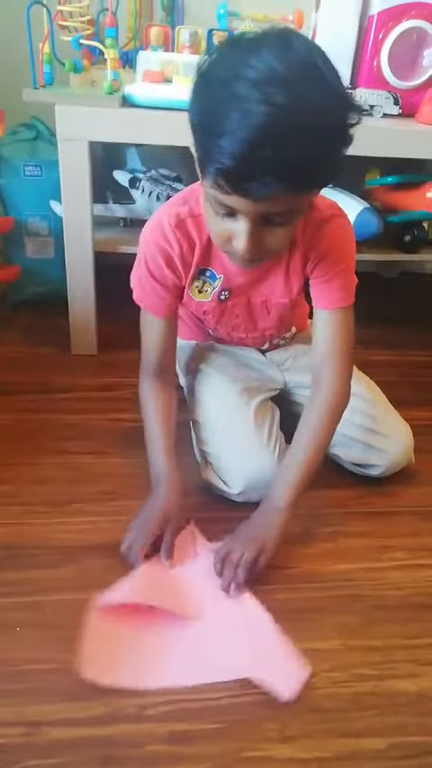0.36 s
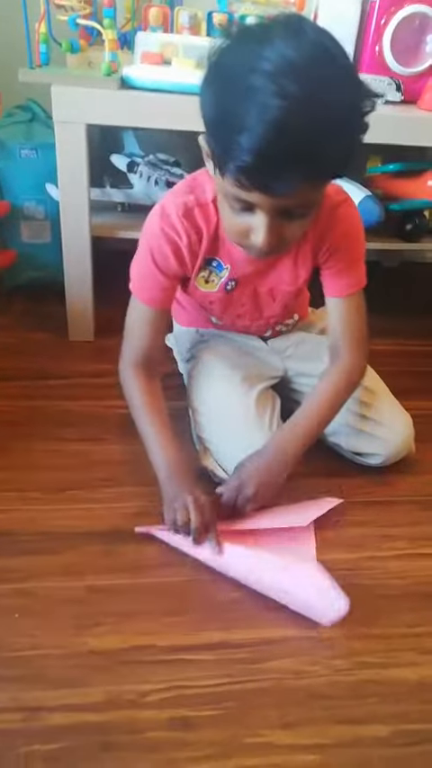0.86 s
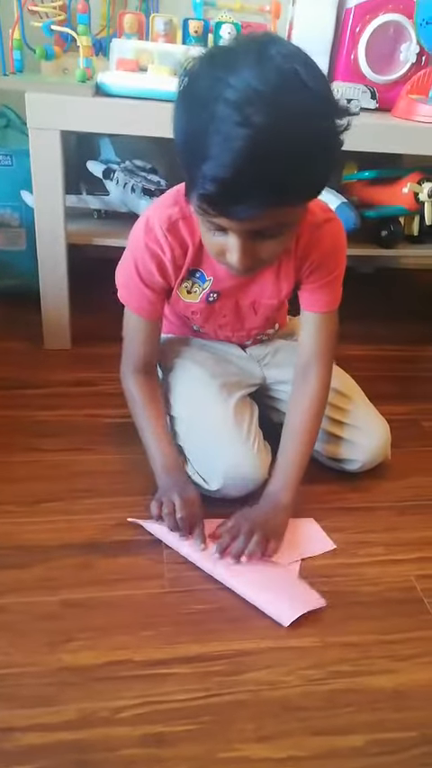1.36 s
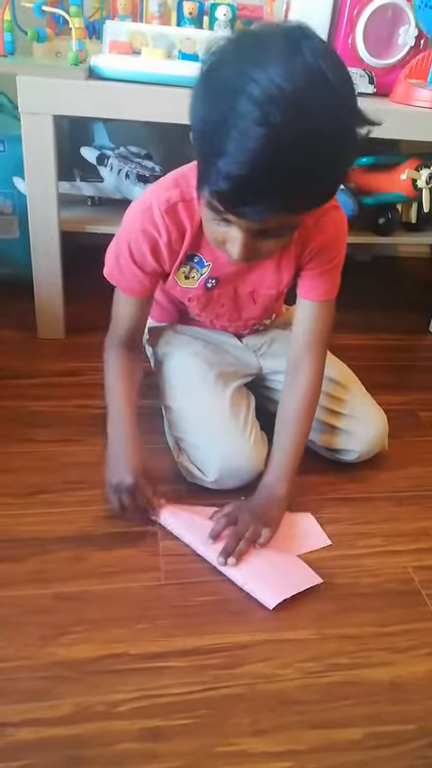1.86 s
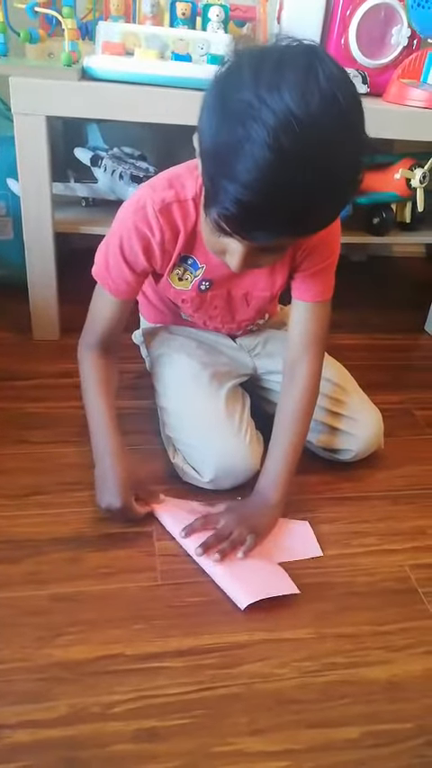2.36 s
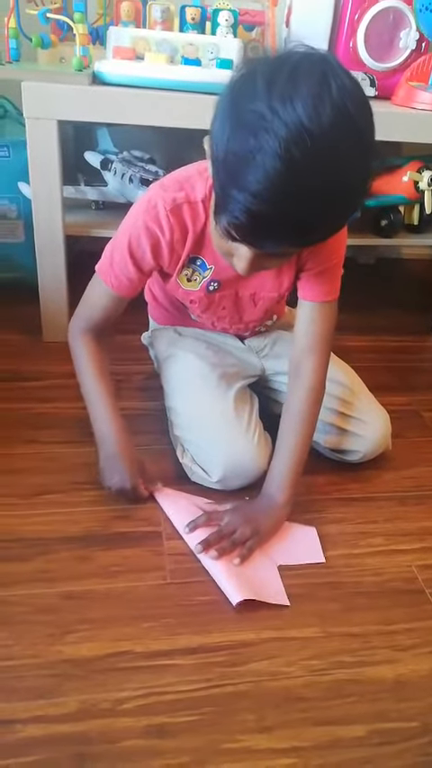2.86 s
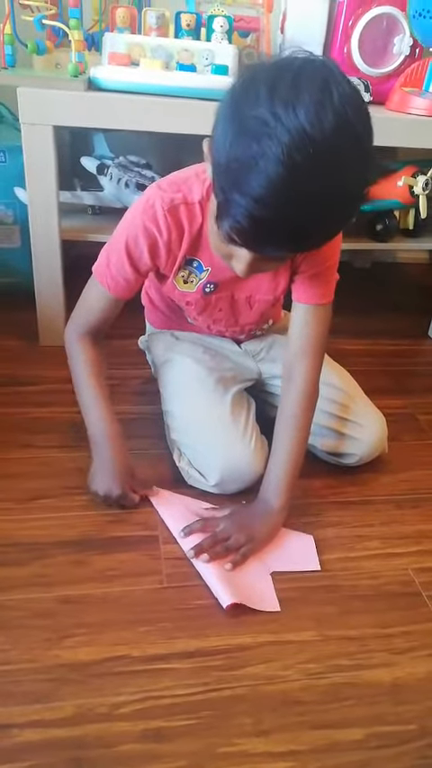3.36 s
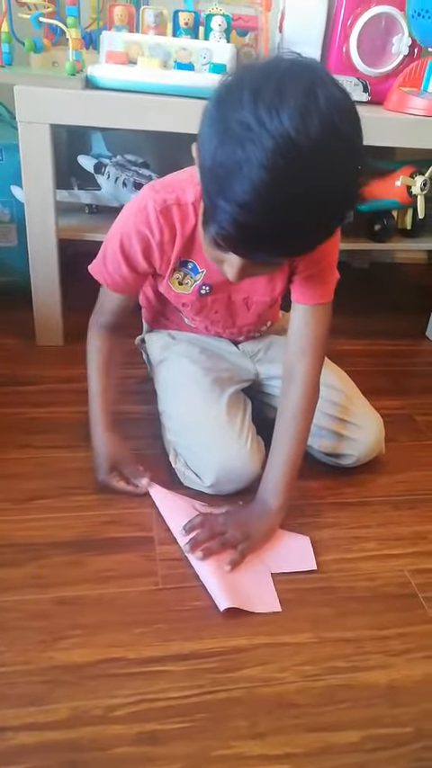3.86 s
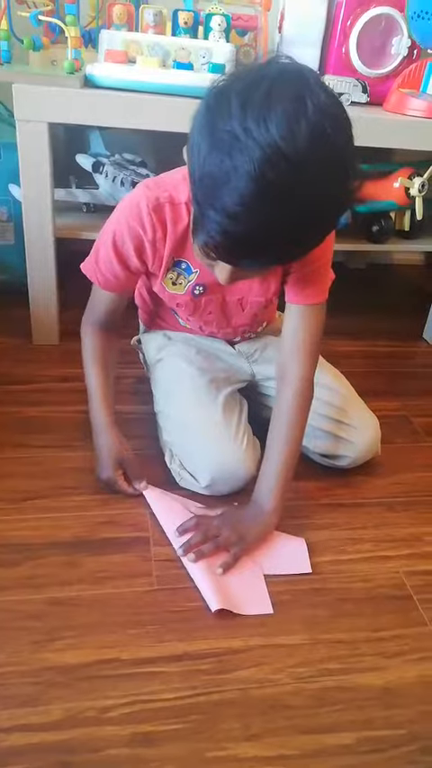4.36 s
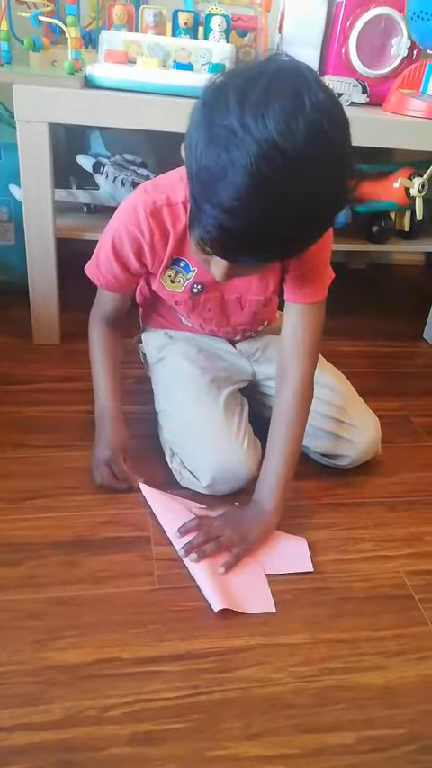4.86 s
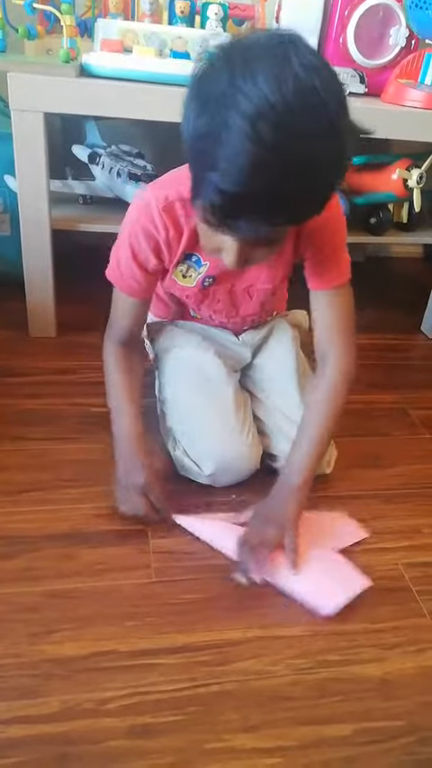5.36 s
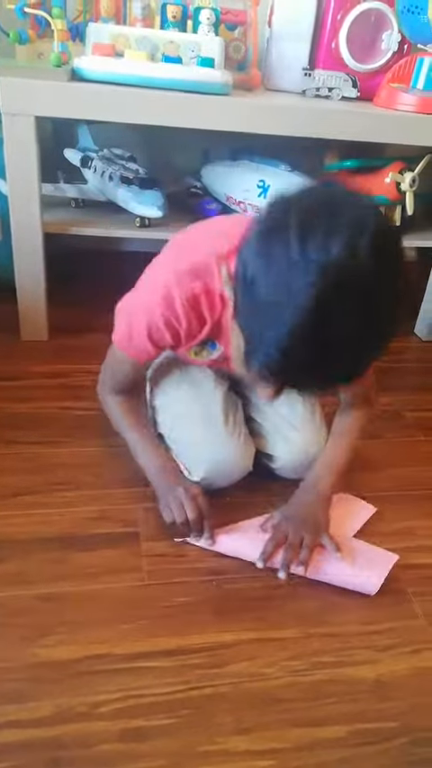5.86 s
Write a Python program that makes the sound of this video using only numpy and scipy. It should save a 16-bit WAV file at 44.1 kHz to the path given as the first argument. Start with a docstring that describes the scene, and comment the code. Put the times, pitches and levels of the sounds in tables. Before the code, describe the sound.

Stiff paper handled on a wooden floor, a couple of metres from a handheld phone indoors. Soft pats and a bright rustling slide open it, a crisp double crease snap follows, then fingers rub with small clicks, a loud snap midway, and quieter scrapes. Near the end the sheet swishes round again. Light room echo, faint hum and low handling bumps lie beneath.

```python
"""A sheet of stiff paper is turned, folded and creased by hand on a wooden floor, a couple of metres from a phone.
Fingers rub it and it slides, as dense noisy fibre catches in four ranges; creases snap as a pop and a crackle.
Hands pat the boards, rough pushes ringing dull modes; a furnished room answers with echoes and a noise tail.
Beneath lie air, a faint hum of narrow noise bands and low bumps of the phone shifting in the hand.
The phone has two ports: the right one faces the paper and is bright, the left one is shaded and hears it later."""
import sys
import numpy as np
from scipy import signal
from scipy.fft import rfft, irfft, next_fast_len
from scipy.io import wavfile
from scipy.ndimage import uniform_filter1d

SR = 44100
rng = np.random.default_rng(int(sys.argv[2]) if len(sys.argv) > 2 else 0)


def linear_from_db(decibels):
    """Turn decibels (scalar or array-like) into linear amplitude factors; 0 gives 1."""
    return 10 ** (np.asarray(decibels, float) / 20)


def file_out(sig):
    """Save sig as 16-bit WAV at sys.argv[1]."""
    # one column per channel
    cols = np.atleast_2d(sig).T
    # limit, then scale
    lim = np.clip(cols, -1, 1)
    pcm = np.round(lim * 32767).astype(np.int16)
    wavfile.write(sys.argv[1], SR, pcm)


N = 274125
SIZE = next_fast_len(N + SR)  # room for filter tails
HZ = np.arange(SIZE // 2 + 1) * SR / SIZE
TIME = np.arange(N) / SR


def on_log(table):
    """A (frequency [Hz], value) table read at every frequency, along a log axis."""
    hz, value = np.transpose(table)
    return np.interp(np.log(HZ + 1), np.log(hz + 1), value)


def causal(table):
    """Minimum-phase response with the gains of a (frequency [Hz], level [dB]) table."""
    cepstrum = irfft(np.log(linear_from_db(on_log(table))), SIZE)
    cepstrum[1:SIZE // 2] *= 2
    cepstrum[SIZE // 2 + 1:] = 0
    return np.exp(rfft(cepstrum))


def resonance(hz, width):
    """Response of one resonance, gain 1 at its centre."""
    return 1j * HZ * width / (hz ** 2 - HZ ** 2 + 1j * HZ * width)


def through(x, response):
    """Filter by a frequency response."""
    return irfft(rfft(x, SIZE) * response, SIZE)[..., :N]


def unit(x):
    """Scale to rms 1."""
    return x / np.sqrt(np.mean(x ** 2))


def walk(rate):
    """Random levels held 1 / rate s and slewed; spread near 1."""
    hold = int(SR / rate)
    steps = np.repeat(rng.standard_normal(N // hold + 1), hold)
    return unit(uniform_filter1d(steps, hold)[:N])


# long waves reach both ports alike: (frequency [Hz], level [dB])
PORT_BASS = [(280, 0)]
# the shaded left port: (frequency [Hz], level [dB])
LEFT_PORT = [(600, -3.5), (900, -6.5), (1300, 2), (2400, 2), (4400, 0), (8000, -7.5), (12000, -17),
             (16000, -7)]
# the bright right port: (frequency [Hz], level [dB])
RIGHT_PORT = [(1300, 0), (2400, 6), (3300, 6.5), (3900, 10), (4800, 7.5), (5500, 8.5), (6600, 6),
              (7800, 11.5), (9300, 10.5), (10800, 2.5), (13000, 1), (16000, -3)]
# how far the left port leads, negative when it hears later: (frequency [Hz], phase [rad])
LEFT_LEAD = [(0, 0), (340, -1.0), (1120, -6.2), (2330, -8.9), (3450, -10.3), (4570, -9.4), (6370, -16.3),
             (9300, -25.5), (10900, -31.5), (13000, -35.8), (13500, -41.0), (15200, -41.5), (15600, -45.1),
             (16000, -43.9)]


def port_responses():
    """Right is minimum phase; left takes the right's phase, shifted by its lead, with gains of its own."""
    right = causal(PORT_BASS + RIGHT_PORT)
    left_over_right = linear_from_db(on_log(PORT_BASS + LEFT_PORT) - on_log(PORT_BASS + RIGHT_PORT))
    shift = np.exp(1j * np.interp(HZ, *np.transpose(LEFT_LEAD)))
    return right * np.array([left_over_right * shift, np.ones_like(HZ)])


PORTS = port_responses()


def loudness(response):
    """Rms that white noise of rms 1 has after a response and the two ports."""
    return np.sqrt(np.mean(np.abs(response) ** 2 * np.sum(np.abs(PORTS) ** 2, axis=0) / 4))


# steady sound common to both ports: (frequency [Hz], share [amplitude ratio])
COMMON_SHARE = [(160, .999), (300, .93), (600, .6), (1200, .5), (3000, .4), (8000, .3), (12000, .2)]


def pair(x):
    """Two noises become left and right: alike in the bass, less so in the treble."""
    share = np.clip(on_log(COMMON_SHARE), 0, 1)
    left = through(x[0], share) + through(x[1], np.sqrt(1 - share ** 2))
    return np.array([left, x[0]])


# ranges the sheet sounds in, flutter, body, scrape, hiss:
# (centre [Hz], width of one resonance, three in a row narrow it [Hz])
SHEET_RANGES = [(1150, 1314), (2250, 2144), (3600, 2900), (8500, 10230)]


def colour(hiss_db, hz, ring_db, db_per_octave):
    """dB of flutter, body, scrape and hiss when the sheet rings most at hz, falling off either side."""
    lows = []
    for centre, _ in SHEET_RANGES[:-1]:
        lows.append(hiss_db + ring_db + db_per_octave * np.abs(np.log2(centre / hz)))
    return np.array(lows + [hiss_db])


# spectrum of the room air: (frequency [Hz], relative level [dB per Hz])
AIR_SPECTRUM = [(20, -20), (60, -3.5), (200, -2), (400, -5.5), (560, -6.5), (1000, -12), (2500, -30),
                (6000, -30.5), (16000, -50)]
# bands of the hum: (frequency [Hz], width of one resonance, two in a row narrow it [Hz], level [dB])
HUM_BANDS = [(62.4, 21.2, -70), (120.42, 14.13, -63.5), (320.22, 22.55, -64), (397.8, 32.4, -68)]
# the phone shifting in the hand: (time [s], level [dB], spread either side [s per 20 dB])
PHONE_BUMPS = [(.05, -73, 0.03), (.6, -71.5, 1.08), (2.18, -54.5, 0.18), (3.39, -57, 0.23),
               (4.55, -61.5, 0.24), (5.09, -51.5, 0.09)]
AIR_DB, HAND_DB = -59.5, -80.5  # room air; the hand's steady tremor


def background():
    """Room air, a wavering hum of narrow noise bands, and low bumps of the hand-held phone."""
    air = linear_from_db(AIR_DB) * unit(through(rng.standard_normal((2, N)), linear_from_db(on_log(AIR_SPECTRUM))))
    hum = 0
    for hz, width, db in HUM_BANDS:
        hum = hum + linear_from_db(db) * unit(through(rng.standard_normal((2, N)), resonance(hz, width) ** 2))
    rumble = unit(through(rng.standard_normal(N), resonance(31.2, 30.6) ** 2))
    grip = linear_from_db(HAND_DB)
    for s, db, spread in PHONE_BUMPS:
        grip = grip + linear_from_db(db - 20 * np.abs(TIME - s) / spread)
    return pair(air + hum) + rumble * grip


# finger strokes on the sheet: (peak time [s], hiss level before trim [dB], rise of the hiss [s per first 20 dB],
# fall of the hiss [s per first 20 dB], ring [Hz], ring above the hiss [dB])
FINGER_STROKES = [(0.066, -37.5, 0.0866, 0.157, 4040, -3), (0.833, -45, 0.054, 0.1565, 3050, -4.0),
                  (1.122, -50, 0.141, 0.177, 1817, -4), (1.267, -46.5, 0.018, 0.047, 3060, -3.5),
                  (1.341, -38.5, 0.029, 0.0807, 2650, -4.5), (1.437, -54, 0.187, 0.117, 1530, 5),
                  (1.578, -49, 0.27, 0.196, 4400, -8.5), (1.661, -48, 0.056, 0.1135, 3030, -4.5),
                  (1.799, -53.5, 0.0177, 0.0125, 3800.0, -3.5), (1.919, -57.0, 0.212, 0.16, 3280, -3.5),
                  (2.015, -58, 0.193, 0.182, 3080, -4), (2.157, -56.5, 0.138, 0.094, 2680, -1),
                  (2.26, -60.5, 0.123, 0.114, 2800.0, -4.0), (2.318, -61, 0.0193, 0.139, 2830, 10.5),
                  (2.461, -54, 0.036, 0.125, 2860, -1.5), (2.518, -40.5, 0.039, 0.144, 3100.0, -13.5),
                  (2.621, -49.5, 0.071, 0.16, 2890, -0.5), (2.87, -63.0, 0.063, 0.26, 3100.0, -0.5),
                  (3.076, -65, 0.0094, 0.205, 2900.0, -4), (3.182, -58, 0.015, 0.074, 2900.0, -10.5),
                  (3.23, -54.0, 0.07, 0.0442, 3700.0, -2.5), (3.388, -56.0, 0.039, 0.127, 3460, 0),
                  (3.457, -50.0, 0.104, 0.123, 4100.0, -3.0), (3.635, -44.5, 0.0189, 0.029, 3500.0, -8.5),
                  (3.681, -51, 0.033, 0.023, 3500.0, -2), (3.729, -53.5, 0.035, 0.0324, 3800.0, 0.5),
                  (3.771, -45.5, 0.0105, 0.042, 3200.0, -5.5), (3.801, -45.5, 0.036, 0.033, 3780, 0.5),
                  (3.897, -44.0, 0.0503, 0.0108, 3900.0, -4.0), (3.914, -59.5, 0.02, 0.038, 3700.0, 3.5),
                  (4.025, -57.5, 0.0296, 0.009, 2900.0, -7), (4.213, -65.5, 0.18, 0.091, 3200.0, -2),
                  (4.268, -53.5, 0.0087, 0.011, 3000.0, -4), (4.368, -46, 0.0156, 0.052, 2610, -6.5),
                  (4.424, -59.5, 0.025, 0.035, 2300, 2), (4.59, -52, 0.0104, 0.096, 3900.0, -8.5),
                  (4.646, -49, 0.0657, 0.043, 3800.0, -5.0), (4.734, -54, 0.097, 0.022, 3800.0, 3.5),
                  (5.631, -40, 0.107, 0.0756, 4160, -4.5), (5.784, -48.5, 0.0656, 0.0424, 3470, -2),
                  (5.844, -46.5, 0.0357, 0.0586, 3520, -5)]
# flutter, body, scrape, hiss; the low ranges linger: (follow [dB per dB of a stroke's swell])
SWELL_FOLLOW = [.7, .8, .9, 1]
STROKE_CURVE = 1.238  # 1 = a pointed stroke, 2 = a rounded one
RUB_DB_PER_OCTAVE = -8.0  # the ranges fall off away from the ring, in strokes and slides alike


def strokes(t):
    """Power in each range of fingers rubbing the sheet: each stroke swells to a peak and dies."""
    power = 0
    for s, db, rise, fall, hz, ring_db in FINGER_STROKES:
        swell_db = -20 * np.abs((t - s) / np.where(t < s, rise, fall)) ** STROKE_CURVE
        peak_db = colour(db, hz, ring_db, RUB_DB_PER_OCTAVE)[:, None]
        power = power + linear_from_db(peak_db + np.outer(SWELL_FOLLOW, swell_db)) ** 2
    return power


# the sheet sliding over the boards, three long moves:
# (time [s], fibre hiss level before trim [dB], ring [Hz], ring above the hiss before flap [dB])
SHEET_SLIDES = [
    [(0.179, -59.0, 2600.0, 1.0), (0.261, -43.0, 2710, 0.0), (0.324, -38.5, 3800.0, -1),
     (0.472, -39.0, 4330, -0.5), (0.523, -34, 4200.0, -7.0), (0.597, -37.0, 4300.0, -3.5),
     (0.656, -29, 4320, -8.5), (0.715, -45.0, 2030, 1), (0.811, -54.0, 2500.0, -1.5)],
    [(4.842, -81.5, 2800.0, -6), (4.872, -57.5, 2760, -4), (4.972, -59, 3080, -4.5),
     (5.017, -49, 3560, -4.0), (5.194, -44.5, 3540, -3.0), (5.28, -37.5, 3980, -3.0),
     (5.405, -34.5, 4420, -5), (5.551, -52.5, 4200.0, -1.0), (5.619, -68.0, 2700.0, -6)],
    [(5.92, -64.5, 3900.0, 5), (5.954, -47.5, 4600.0, -5), (6.003, -52, 4600.0, -2.5),
     (6.109, -52.5, 4600.0, 0.5), (6.147, -46.5, 4600.0, -0.5), (6.171, -51.5, 3000.0, 1.5),
     (6.22, -48.5, 3400.0, -3.5)],
]
# how freely the sheet flaps in each slide: (flutter level [dB], body level [dB])
SLIDE_FLAP = [(-3.5, 1.5), (3.5, -0.5), (3.5, -3.5)]


def slides(t):
    """Power in each range of the sheet sliding: level and ring glide from point to point."""
    power = 0
    for points, flap_db in zip(SHEET_SLIDES, SLIDE_FLAP):
        s, db, hz, ring_db = np.transpose(points)
        hiss_db = np.interp(t, s, db, left=-150, right=-150)
        range_db = colour(hiss_db, np.interp(t, s, hz), np.interp(t, s, ring_db), RUB_DB_PER_OCTAVE)
        power = power + linear_from_db(range_db + np.array([*flap_db, 0, 0])[:, None]) ** 2
    return power


# rubbing favours flutter over the body; flutter, body, scrape, hiss: (trim [dB])
RUB_TRIM = [0.68, -1.7, -0.0041, 0.117]


def effort():
    """Level in dB of each range of the sheet: the powers of slides and strokes add up."""
    t = TIME[::32]
    power = 1e-18 + slides(t) + strokes(t)
    return [np.interp(TIME, t, 10 * np.log10(p)) + db for p, db in zip(power, RUB_TRIM)]


def rubbing(grain_db=2.0, judder_db=1.5, flicker_db=1.36):
    """Dense fibre catches of uneven size; the hand judders, so all ranges stutter together."""
    judder = judder_db * walk(45)
    out = 0
    for mode, db in zip(SHEET_RANGES, effort()):
        size = np.minimum(rng.exponential(size=N), 5)  # no catch grows into a snap
        catches = unit(rng.standard_normal((2, N)) * linear_from_db(grain_db * size))
        swell = linear_from_db(db + judder + flicker_db * walk(18))  # each range also flickers alone
        shape = resonance(*mode) ** 3
        out = out + through(catches * swell, shape / loudness(shape))
    return pair(out)


# creases snapping: (time [s], hiss level before the pop's own [dB], ring [Hz], ring above the hiss [dB])
CREASE_SNAPS = [(0.0714, -30.5, 2240, 0.5), (0.7146, -34, 2000, 2.5), (1.3017, -16, 2757, -0.5),
                (1.3073, -24, 1970, 0.5), (1.3187, -29.5, 3000, -0.5), (1.3675, -35.5, 1150, 5.5),
                (1.7893, -44, 4000, -4.5), (1.9976, -37, 4000, -10.5), (2.0466, -43.5, 3800, -14.5),
                (2.1861, -43, 2500, -3), (2.3044, -37, 2600, 20), (2.575, -12, 2900, -5.5),
                (2.59, -26.5, 2305, -4), (2.8354, -44, 1150, -8.5), (2.924, -41, 4000, -13),
                (2.988, -45, 1400, 1.5), (3.024, -42.5, 1300, -11.5), (3.0706, -42.5, 4200, -5.5),
                (3.178, -40.5, 3800, -9.5), (3.343, -60, 3600, 31), (3.894, -29, 3800, -15.5),
                (4.0, -46, 4000, -9), (4.1033, -44, 4000, -6.5), (4.2643, -40, 4200, -11.5),
                (4.366, -41, 3600, -14), (4.3894, -49.5, 2200, 4), (4.4296, -47.5, 1710, 11),
                (4.4777, -47.5, 3000, -15), (4.5881, -31, 3550, -5.5), (4.6153, -30.5, 4190, 2.5),
                (4.7328, -34, 2805, 0), (4.8533, -50, 2890, 3.5), (4.9087, -44, 3800, -16.5),
                (4.974, -43, 1940, 7), (5.2935, -25.5, 1196, -9.5), (6.1701, -38.5, 1150, -1.5)]
# flutter, body, scrape, hiss; flutter pops softest, body loudest, and low ranges shudder longer: (pop level
# [dB], crackle stretch [ratio])
RANGE_POPS = [(-5.5, 1.99), (5, 1.586), (1, 1.19), (3.0, 0.87)]
SNAP_DB_PER_OCTAVE = -16  # a snap falls off away from its ring
CRACKLE_DB, CRACKLE_MS = -9, 1.682  # crackle under the pop; its decay time constant before the stretch
TICKS_PER_S, TICK_DB = 4, -53  # faint ticks of the settling sheet; the softest tick


def settling_ticks():
    """Rows like the snaps', at random times, up to 9 dB over the softest and ringing at 1200 to 4800 Hz."""
    luck = rng.random((100, 3))
    when = np.cumsum(-np.log(1 - luck[:, 0])) / TICKS_PER_S
    ticks = []
    for s, (_, strength, pitch) in zip(when, luck):
        if s < N / SR:
            ticks.append((s, TICK_DB + 9 * strength, 1200 * 4 ** pitch, -12))
    return ticks


def snaps():
    """A crease gives way in one pop, then crackles for a few ms; faint ticks fall at random between."""
    t = np.arange(1500) / SR
    pop_db, stretch = np.transpose(RANGE_POPS)
    decay = np.exp(-t * 1000 / (CRACKLE_MS * stretch[:, None]))
    force = np.zeros((len(SHEET_RANGES), N + len(t)))
    for s, hiss_db, hz, ring_db in CREASE_SNAPS + settling_ticks():
        burst = linear_from_db(CRACKLE_DB) * rng.standard_normal(decay.shape) * decay
        burst[:, 0] = linear_from_db(pop_db)
        i = int(s * SR)
        force[:, i:i + len(t)] += linear_from_db(colour(hiss_db, hz, ring_db, SNAP_DB_PER_OCTAVE))[:, None] * burst
    out = 0
    for push, mode in zip(force, SHEET_RANGES):
        shape = resonance(*mode) ** 3
        peak = np.abs(irfft(shape * PORTS[1], SIZE)).max()  # a lone unit pop peaks at 1 in the right port
        out = out + through(push[:N], shape / peak)
    return out


# hands and paper edge on the boards: (time [s], peak level before room and ports [dB], contact [ms])
BOARD_PATS = [(.072, -37.5, 2.46), (.102, -35.5, 4), (.125, -38, 2.25), (.166, -40, 2.1), (.70, -32, 0.8),
              (.716, -25.5, .35), (1.335, -30.5, .3), (6.15, -41.5, .3)]
# modes of the floor boards:
# (frequency [Hz], width [Hz], level before contact softening [dB], t60 of the push [s])
BOARD_MODES = [(225.6, 76, -19, 0.119), (339, 88, -15, 0.132), (403, 89, -11.5, 0.223),
               (836, 427, 2.5, 0.0776)]


def pats():
    """Each pat is a rough, dying push that rings the boards dully; a long soft contact wakes only the low modes."""
    out = np.zeros(N)
    t = np.arange(SR // 4) / SR
    for s, peak_db, ms in BOARD_PATS:
        grit = rng.standard_normal(len(t))
        grit[0] = 4  # the first contact is firm
        ring = 0
        for hz, width, db, t60 in BOARD_MODES:
            push = grit * linear_from_db(-60 * t / t60)
            mode = unit(signal.lfilter(*signal.iirpeak(hz, hz / width, fs=SR), push))
            softening = 1 + (hz * ms / 1000) ** 4
            ring = ring + linear_from_db(db) * mode / softening
        part = out[int(s * SR):][:len(t)]
        part += linear_from_db(peak_db) * (ring / np.abs(ring).max())[:len(part)]
    return out


# near furniture: (delay [ms], level [dB])
NEAR_ECHOES = [(7.0, -15), (16.5, -18)]
ROOM_DB, ROOM_TREBLE_DB = -9, -2.5  # whole tail; its treble before the whole is levelled
ROOM_T60_S, ROOM_TREBLE_T60_S = 0.462, 0.277


def room_fade(t60):
    """Two noise tails, one a port, that rise over the first few ms and die away."""
    t = np.arange(SR // 2) / SR
    onset = np.clip(t / 0.00724 - .5, 0, 1)
    return rng.standard_normal((2, len(t))) * linear_from_db(-60 * t / t60) * onset


def room(x):
    """A few near echoes, then a tail whose treble dies first; each port gets its own tail."""
    low = 1 / (1 + 1j * HZ / 3000)
    tail = rfft(room_fade(ROOM_T60_S), SIZE) * low
    tail = tail + rfft(room_fade(ROOM_TREBLE_T60_S), SIZE) * (1 - low) * linear_from_db(ROOM_TREBLE_DB)
    tail = tail / np.sqrt(np.mean(np.abs(tail) ** 2))
    echoes = 0
    for ms, db in NEAR_ECHOES:
        echoes = echoes + linear_from_db(db) * np.exp(-2j * np.pi * HZ * ms / 1000)
    return through(x, 1 + echoes + linear_from_db(ROOM_DB) * tail)


def scene():
    """Paper and hands in the room, over the background."""
    return room(linear_from_db(-1.0) * rubbing() + snaps() + pats()) + background()


def low_pass(x):
    """Removes everything above the highest recorded frequency."""
    return signal.sosfilt(signal.butter(12, 16470, fs=SR, output="sos"), x)


def record(dry):
    """Each port colours and delays what reaches it and adds its own faint hiss; the top is cut at 15.8 kHz."""
    hiss = linear_from_db(-68.5) * through(rng.standard_normal((2, N)), resonance(4600, 20000))
    mix = through(through(dry, PORTS) + hiss, HZ < 15800)
    return low_pass(mix)


dry = scene()
out = record(dry)
file_out(out)
```